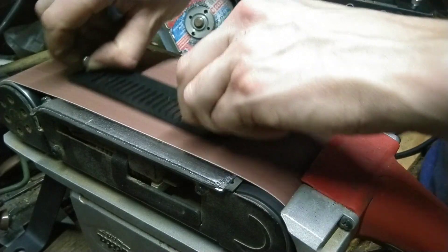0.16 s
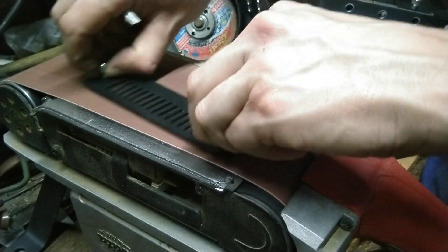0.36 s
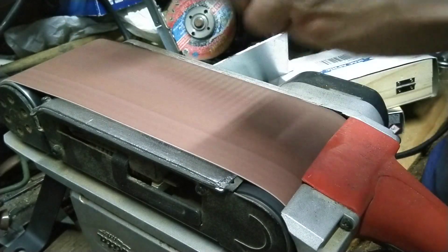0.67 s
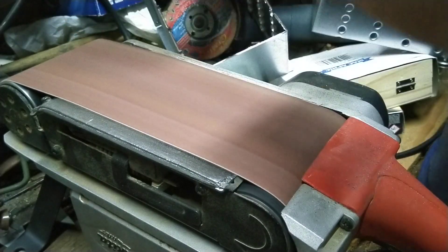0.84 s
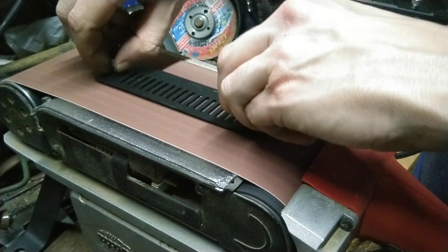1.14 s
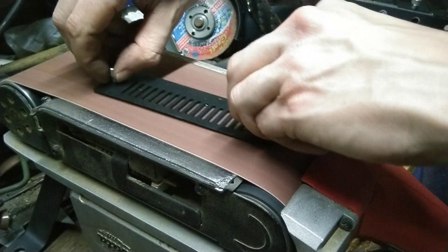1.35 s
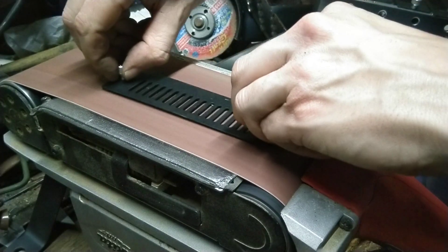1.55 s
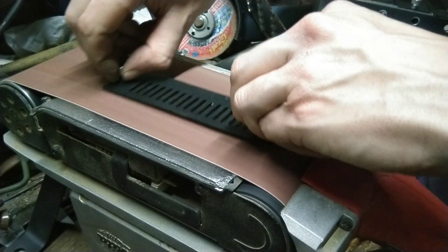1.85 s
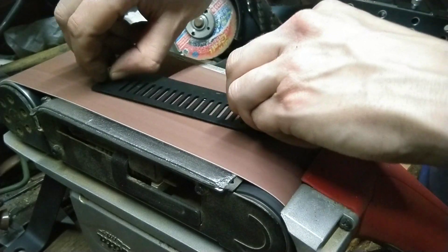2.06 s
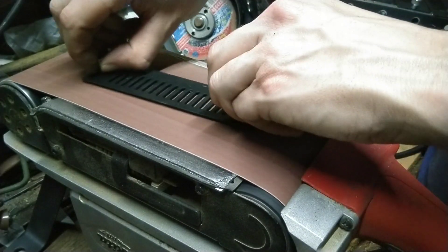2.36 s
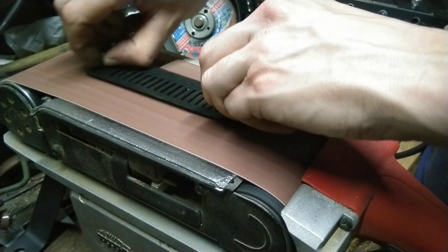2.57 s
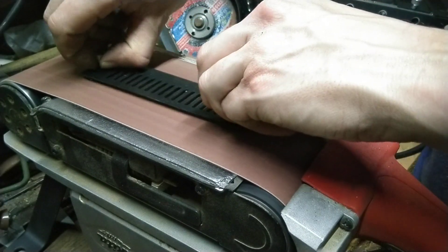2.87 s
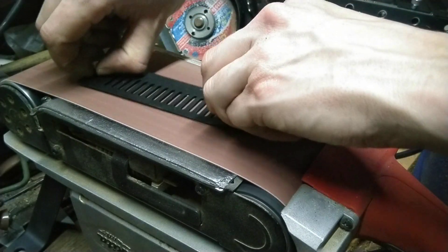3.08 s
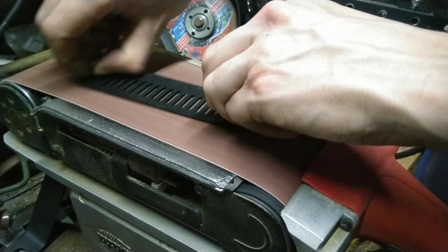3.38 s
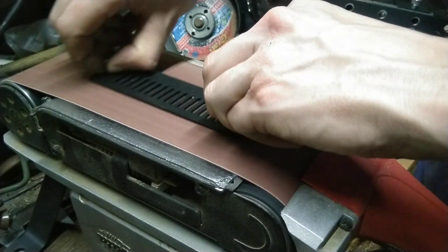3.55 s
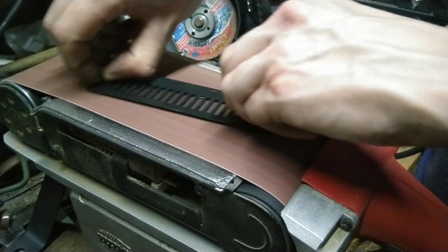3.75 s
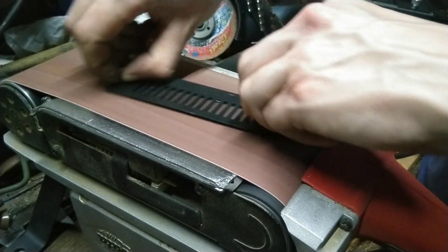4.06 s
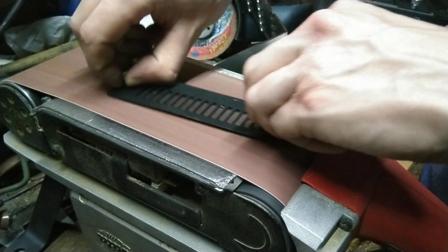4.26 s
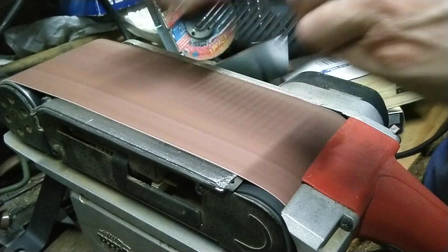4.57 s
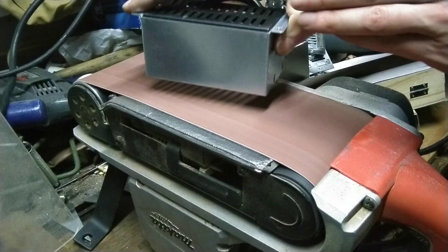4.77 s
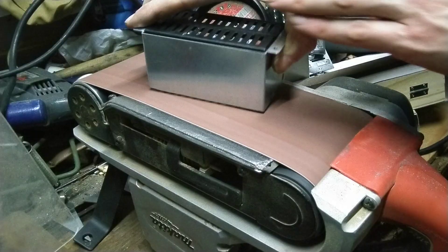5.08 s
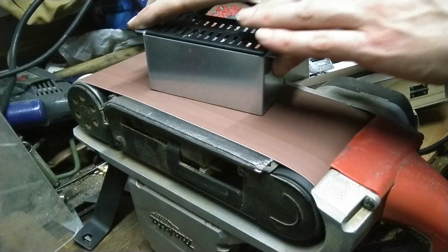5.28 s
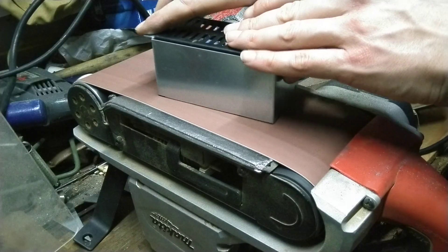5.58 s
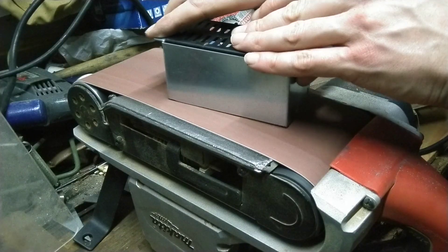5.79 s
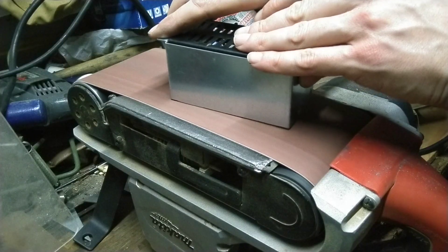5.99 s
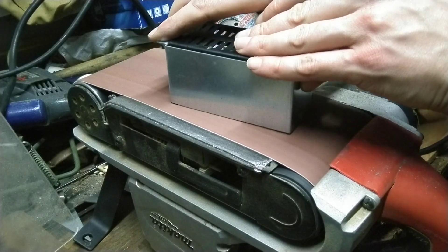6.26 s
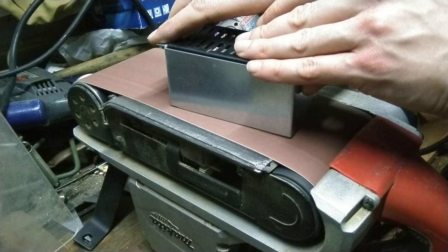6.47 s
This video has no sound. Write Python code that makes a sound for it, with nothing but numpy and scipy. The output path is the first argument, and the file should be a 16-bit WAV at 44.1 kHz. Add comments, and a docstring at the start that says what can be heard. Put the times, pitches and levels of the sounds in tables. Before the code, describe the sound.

Belt sander whines steadily while a slotted steel strip rasps in three gritty strokes, then a sheet-metal box rubs amid a fuller roar.

```python
"""Belt sander at the bench

A fast motor whines over the roar of fan, gears and belt, in tones locked to the rotor and bands of noise.
Random grit ticks excite a slotted steel strip in three strokes; then the modes of a sheet-metal box ring.
Lumpy low noise is fan air buffeting the right microphone port; short patches of noise near 830 Hz leak
through the noise suppressor, which holds the steady roar down at first; at 4.809 s, as the box takes over,
it is off and the roar opens up."""
import sys
import numpy as np
from scipy import signal
from scipy.fft import rfft, irfft
from scipy.io import wavfile
from scipy.ndimage import uniform_filter1d

SR = 44100
rng = np.random.default_rng(int(sys.argv[2]) if len(sys.argv) > 2 else 0)


def int16_out(signal):
    """Quantize to a 16-bit WAV file."""
    q = np.round(np.clip(np.atleast_2d(signal).T, -1, 1) * 32767)
    wavfile.write(sys.argv[1], SR, q.astype(np.int16))


N = 292383
T = np.arange(N) / SR   # time of every sample, s
SWITCH_S = 4.809   # a cut: from here the suppressor is off and the box replaces the strip
EARLY = T < SWITCH_S

# rotor speed, sagging under load and recovering when free; it jumps at the cuts at 0.91 and 4.81 s:
# t/s, speed/(turns per s)
ROTOR = [(0, 327), (.45, 325.7), (.905, 332.2), (.915, 337), (1.25, 336.6), (1.75, 330.3), (2.25, 327.8),
         (2.5, 327), (3.3, 331.3), (3.6, 330.6), (4.55, 327.2), (4.8, 331), (4.82, 333.2), (5.4, 333.1),
         (5.7, 331.9), (6.63, 326.4)]
# tones locked to the rotor (unbalance, gear train, fan blades, commutator): multiple of rotor speed
MULTIPLES = [1, 2, 2.205, 4.41, 8.8, 18, 31, 37]
# mean strength of each of those tones: level before switch/dB, level after/dB, left-right/dB
TONES = [(-54.5, -57, -1), (-57, -52.5, -20), (-62, -61, -6), (-48, -51, 0), (-53, -56.5, 0.5),
         (-56, -124, 2.5), (-46, -46, -2.5), (-52.5, -50, -2)]
WAVER_DB = 1.6   # spread of each tone's level
# the hands leave the belt and stop shading the high whine: start t/s, end t/s, lift/dB
HANDS_OFF = [(0.4, 0.535, 2.5), (4.659, 4.81, 3)]
SHADED_ABOVE, HANDS_MOVE_S = 30, .03   # shaded multiples of the rotor lie above this; time of the hands' move

# colour of the roar: f/Hz, relative level per Hz/dB
ROAR = [(120, -43), (200, -21), (386, -9.5), (667, -6), (772, -4), (1050, -10), (1490, -4), (1890, -9),
        (2530, -8.5), (3580, -8), (6080, -11), (10500, -11), (15700, -14.5)]
ROAR_DB = -33   # all bands together
# stereo balance of the machine: f/Hz, left-right/dB
ROAR_BALANCE = [(60, -18.0), (110, -17.0), (200, -12), (380, -7), (700, -4.5), (1290, -2), (2380, -5),
                (4400, 0), (8120, -7), (15000, 3)]
# resonances of the housing: f/Hz, width/Hz, level/dB
HOUSING = [(656, 84, -56.5), (1535, 86, -47.5), (2124, 290, -49), (3640, 11, -63), (6570, 50, -68),
           (7510, 47, -70.5), (11500, 150, -57), (11780, 320, -52.5)]
# likeness of left and right in the finished stereo sound; treble above 7 kHz is nearly mono: f/Hz, likeness
LIKENESS = [(300, 0.98), (520, 0.84), (770, 0.24), (1500, 0.083), (3000, 0.19), (6300, 0.062), (7300, 0.93),
            (15000, 1)]
# left channel's lead in samples, applied only below 6500 Hz; the near-mono treble has none
LEFT_LEAD, LEAD_BELOW_HZ = 7, 6500

# the strip on the belt: t/s, pressure as relative level/dB, tilt/(dB per octave), lift of the ring/dB
STROKES = [(0.0, -39.5, 0, 5), (0.22, -41.5, 3, 5), (0.35, -42, -0.2, -1), (0.5, -42.5, 1, -2),
           (0.62, -49.5, 1, 0), (1.0, -53, -5.1, 2.5), (1.15, -43, -1, 2.5), (1.3, -40, 1, 0),
           (1.45, -38.5, 0.3, 2), (1.75, -37.5, 0.6, 0.6), (2.25, -38, 0, 2.2), (2.36, -38.5, 0.1, -4.5),
           (2.62, -41.5, -1.5, 2), (2.7, -48.5, -1, -3), (2.8, -53, 6.5, -5), (2.98, -53.5, -2, -14),
           (3.09, -43, 0.5, -10), (3.28, -42, -0.5, -1), (3.36, -39.5, -0.5, 2.5), (3.52, -41, 0.2, -5),
           (3.7, -37.5, 0.1, -3.5), (3.9, -37, 0.8, 0), (4.1, -37, 0.7, 0), (4.3, -37, 0.5, 0.5),
           (4.53, -37, -0.15, 1), (4.6, -47.5, -1.5, -1), (4.66, -49, 5, 6), (4.8, -51, -1, 0.3)]
TILT_HZ, RING_HZ, RING_OCTAVES = 5860, 8600, 0.19   # pivot of the tilt; centre and width of the loudest ring
# modes of the strip: f/Hz, width/Hz, relative level/dB, left-right/dB
STRIP = [(1473, 13, -8.5, -16), (1915, 93, -7, -14), (2130, 270, -8, 18), (2901, 105, 1.5, -2),
         (3332, 430, -1.5, -14), (4434, 230, 0.5, -5), (4844, 120, -1, -0.5), (5860, 65, -4.5, -7),
         (6554, 130, -11.5, 15), (7070, 46, -9.5, -16), (8142, 280, -2.5, -9.5), (8500, 380, -12, -14.5),
         (8880, 150, -9, -12), (9610, 110, -10, 2), (10390, 790, -2, -9), (11040, 250, -15, 1),
         (11640, 90, -10.5, 15), (12150, 470, -20, 21), (12440, 870, -8, -5), (13100, 330, -20, -23)]
# broad rasp of the grit: low f/Hz, high f/Hz, relative level/dB, left-right/dB
RASP = [(1353, 1510, -1.5, 5.5), (2646, 3900, 2, 8), (4290, 5130, -2, -15), (5520, 7060, -5.5, -11.5),
        (7070, 8850, -4, -13), (8960, 11430, -0.5, -12.5), (10600, 16500, -5, 10), (12100, 16600, -11, 5.5)]
FIRM_DB, RASP_STEEPER = -35.5, 0.21   # below firm pressure the rasp fades faster than the modes (dB per dB)
# colour of the strip's sound, which the fingers damp unevenly: f/Hz, relative level/dB in four stretches
GRIT = [(1450, 1, -4.5, -3.5, -3.5), (1990, 1.5, -2, -3.5, -3), (2840, -2, -2, -3, -4.5),
        (3540, -12, -2.5, -2, 0.34), (4570, -6.5, -5, -4, -8.5), (5100, -8, -3, -1, -3.5),
        (6300, -3.5, -3.5, -2, -3.5), (8000, 1.2, -0.7, -2, -2.5), (9350, 1.1, 0.8, -2, 2.2),
        (11300, 1.8, 1.5, 0.5, 0.5), (13400, 1, 3, 5, 4)]
# times where the strip's colour changes, a cut at 0.91 s, then new grips: t/s
RECOLOUR_S = [.91, 2.8, 3.56]
# lift of the strip's thin low ring, which stands out at light touch: t/s, lift/dB
LOW_RING = [(0, 5.5), (.4, 5), (.55, -2), (1.2, -1.5), (2.2, 0.1), (2.65, -1), (2.82, -1), (2.9, 17.5),
            (3.05, 7.5), (3.2, 3), (3.4, 1), (4.6, 1.8)]
LOW_RING_HZ, LOW_RING_OCTAVES = 2890, .04

# colour of the air noise: f/Hz, relative level per Hz/dB
BUFFET_COLOUR = [(18, -42), (30, -16.5), (87, 1.5), (146, -1.5), (247, -12.5), (300, -4), (390, -28.5),
                 (660, -120)]
# gusts of fan air, before the gain of each port: start t/s, hold/s, level/dB
GUSTS = [(0.035, 0.086, -46.5), (0.244, 0.014, -47), (0.379, 0.028, -55.5), (0.441, .03, -48),
         (0.535, 0.024, -44), (0.633, 0.025, -51.5), (0.884, 0.013, -59), (0.982, 0.06, -51.5),
         (1.053, 0.054, -57), (1.262, .06, -52.5), (1.339, 0.018, -38.5), (1.435, .01, -44),
         (1.6, 0.014, -45), (1.7, 0.0077, -44.5), (1.877, 0.044, -57), (1.93, 0.022, -53),
         (2.138, 0.073, -47.5), (2.261, 0.014, -37), (2.33, 0.035, -61), (2.516, 0.047, -50),
         (2.668, 0.039, -42), (2.777, .03, -40.5), (3.069, 0.017, -43), (3.17, 0.041, -46),
         (3.463, 0.011, -52), (3.643, 0.089, -50), (3.787, .01, -47), (4.073, 0.012, -42.5),
         (4.2, 0.045, -46.5), (4.345, 0.0091, -54), (4.524, 0.062, -42.5), (4.701, 0.026, -43.5),
         (4.792, 0.0084, -45), (4.877, 0.025, -41), (5.016, 0.089, -44), (5.337, 0.043, -39),
         (5.489, 0.012, -43.5), (5.56, 0.12, -48), (5.844, 0.024, -44), (5.944, 0.0062, -37),
         (6.12, 0.013, -51.5), (6.226, 0.057, -52), (6.455, 0.015, -46), (6.57, 0.017, -41.5)]
GUST_RISE_DB_PER_S, GUST_FALL_DB_PER_S = 700, 348
BREEZE_DB, BREEZE_AFTER_DB = -66.5, -55   # mean air between gusts, before and after the switch
BREEZE_SWING_DB = 3.5

# short patches of noise near 830 Hz that leak through the noise suppressor: t/s, peak level/dB
LEAKS = [(0.601, -45), (1.0, -44), (1.08, -47), (2.74, -46), (2.981, -47)]
LEAK_HZ, LEAK_WIDTH_HZ, LEAK_S = 830, 73, 0.033
# modes of the box: f/Hz, width/Hz, starting level/dB, growth/(dB per s)
BOX = [(528, 67, -46, -1.7), (2578, 71, -53, 5), (2510, 45, -58, 3), (4260, 47, -55.5, 2.2),
       (5230, 67, -66, 13), (7580, 120, -51.5, 2.4)]
CUTOFF_HZ = 15780   # top of the finished sound


def amp(db):
    """Decibels to gain."""
    return 10 ** (np.asarray(db) / 20)


def sides(pan_db):
    """Left and right gains that differ by pan_db."""
    return amp([[pan_db / 2], [-pan_db / 2]])


def rms_one(x):
    """Scale to rms 1."""
    return x / np.sqrt(np.mean(x ** 2) + 1e-20)


def in_time(rows):
    """Columns of a curve table at every sample."""
    s, *columns = np.transpose(rows)
    return [np.interp(T, s, c) for c in columns]


def at_hz(points, hz):
    """A spectrum read on a log frequency axis."""
    points_hz, values = np.transpose(points)
    return np.interp(np.log(hz), np.log(points_hz), values)


def bell(hz, centre_hz, octaves):
    """Bell-shaped weight around a pitch, 1 at its centre."""
    return np.exp(-(np.log2(hz / centre_hz) / octaves) ** 2)


def drift(rate_hz):
    """Slow random curve of spread 1: noise smoothed by two equal poles on a grid of 40 samples."""
    r = np.exp(-80 * np.pi * rate_hz / SR)
    noise = rng.standard_normal(N // 40 + 2002)
    slow = signal.lfilter([1], [1, -2 * r, r * r], noise)[2000:]   # start-up dropped
    return np.interp(np.arange(N) / 40, np.arange(len(slow)), rms_one(slow))


def pair(mid_side, hz, pan_db):
    """Two unrelated signals become left and right of the likeness at this pitch."""
    alike = np.clip(at_hz(LIKENESS, hz), -1, 1)
    mid = np.sqrt(1 + alike) * mid_side[0]
    side = np.sqrt(1 - alike) * mid_side[1]
    both = np.array([mid + side, mid - side])
    if hz < LEAD_BELOW_HZ:
        both[0] = np.roll(both[0], -LEFT_LEAD)
    return both * sides(pan_db) / np.sqrt(2)


def band_pass(x, low_hz, high_hz):
    """Keep one band of a noise."""
    return signal.sosfilt(signal.butter(2, [low_hz, high_hz], "band", fs=SR, output="sos"), x)


def resonance(x, hz, width_hz):
    """A two-pole resonance driven by x; rms 1."""
    r = np.exp(-np.pi * width_hz / SR)
    return rms_one(signal.lfilter([1, 0, -1], [1, -2 * r * np.cos(2 * np.pi * hz / SR), r * r], x))


def whine(waver_db, wander):
    """Sines follow the rotor's turning; each wavers a little in level and phase."""
    turn = 2 * np.pi * np.cumsum(in_time(ROTOR)[0]) / SR
    clear_db = 0
    for start, end, lift_db in HANDS_OFF:
        hands_away = np.clip(np.minimum(T - start, end - T) / HANDS_MOVE_S + 1, 0, 1)
        clear_db = clear_db + lift_db * hands_away * EARLY
    out = 0
    for multiple, (before_db, after_db, pan_db) in zip(MULTIPLES, TONES):
        level_db = np.where(EARLY, before_db, after_db) + waver_db * drift(8.8)
        if multiple > SHADED_ABOVE:
            level_db = level_db + clear_db
        phase = multiple * turn + wander * multiple ** 0.14 * drift(13.4)
        out = out + amp(level_db) * np.sin(phase) * sides(pan_db)
    return np.sqrt(2) * out   # sines to rms 1


def roar(flicker_db):
    """Fan air and running belt: third-octave noise bands that flicker, plus the housing's resonances."""
    out, together = 0, drift(37)
    edges = np.geomspace(180, 18000, num=21)
    white = rng.standard_normal((2, 2, N))
    for k, (low, high) in enumerate(zip(edges, edges[1:])):
        hz = np.sqrt(low * high)
        band = band_pass(white[k % 2], low, high)   # neighbours use different noise
        gain = amp(at_hz(ROAR, hz) + flicker_db * (0.45 * together + drift(3.1)))
        out = out + gain * pair(band, hz, at_hz(ROAR_BALANCE, hz))
    out = amp(ROAR_DB) * rms_one(out)
    for k, (hz, width_hz, level_db) in enumerate(HOUSING):
        # reversed noise keeps the resonances unrelated to the bands
        rung = resonance(white[1 - k % 2, :, ::-1], hz, width_hz)
        out += amp(level_db + 2.08 * drift(18.0)) * pair(rung, hz, at_hz(ROAR_BALANCE, hz))
    return out


def scrape(grains_per_s, patchy_db, lift_db):
    """Abrasive grains tick against the strip: a broad rasp and ringing modes, damped unevenly by the fingers."""
    ticks = rng.random((2, 2, N)) < grains_per_s / SR
    grit = rng.standard_normal((2, 2, N)) * ticks + 1e-18
    pressure_db, tilt_db, ring_db = in_time(STROKES)
    low_ring_db, = in_time(LOW_RING)
    chatter = drift(34)   # shared by all parts
    grit_hz, *colours_db = np.transpose(GRIT)
    stretch = np.searchsorted(RECOLOUR_S, T)
    rasp_db = RASP_STEEPER * (pressure_db - FIRM_DB)

    parts = []
    for low, high, level_db, pan_db in RASP:
        sound = rms_one(band_pass(grit[0], low, high))
        parts.append((np.sqrt(low * high), sound, level_db + rasp_db, pan_db))
    for hz, width_hz, level_db, pan_db in STRIP:
        parts.append((hz, resonance(grit[1], hz, width_hz), level_db, pan_db))

    out = 0
    for hz, sound, level_db, pan_db in parts:
        colour_db = np.array([np.interp(np.log(hz), np.log(grit_hz), colour) for colour in colours_db])
        stroke_db = pressure_db + tilt_db * np.log2(hz / TILT_HZ) + colour_db[stretch]
        stroke_db = stroke_db + ring_db * bell(hz, RING_HZ, RING_OCTAVES)
        stroke_db = stroke_db + low_ring_db * bell(hz, LOW_RING_HZ, LOW_RING_OCTAVES)
        patches_db = patchy_db * (drift(5) + .4 * chatter)
        out = out + amp(stroke_db + level_db + lift_db + patches_db) * pair(sound, hz, pan_db)
    return out * EARLY


def buffet(lumpy_db, left_db, right_db):
    """Eddies push on the ports: low lumpy noise, its own in each; gusts rise fast, hold and die into the breeze."""
    hz = np.maximum(np.arange(N // 2 + 1) * SR / N, 1)
    spectrum = rfft(rng.standard_normal((2, N))) * amp(at_hz(BUFFET_COLOUR, hz))
    air = rms_one(irfft(spectrum, N))
    level_db = np.where(EARLY, BREEZE_DB, BREEZE_AFTER_DB) + BREEZE_SWING_DB * drift(6.8)
    for start, hold_s, gust_db in GUSTS:
        rise_db = GUST_RISE_DB_PER_S * np.maximum(start - T, 0)
        fall_db = GUST_FALL_DB_PER_S * np.maximum(T - start - hold_s, 0)
        level_db = np.maximum(level_db, gust_db - rise_db - fall_db)
    return air * amp(level_db + lumpy_db * drift(50)) * amp([[left_db], [right_db]])


def leaks():
    """Noise leaking through the suppressor: short patches near 830 Hz, the same left and right."""
    swell = sum(amp(db) * np.exp(-((T - s) / LEAK_S) ** 2) for s, db in LEAKS)
    return swell * resonance(rng.standard_normal(N), LEAK_HZ, LEAK_WIDTH_HZ)


def box(patchy_db):
    """The belt rubs the box's edge; pressed harder, its modes ring up, save the lowest, which fades."""
    since, out = T - SWITCH_S, 0
    for hz, width_hz, level_db, growth_db in BOX:
        rung = resonance(rng.standard_normal((2, N)), hz, width_hz)
        gain = amp(level_db + growth_db * since + patchy_db * drift(7.1))
        out = out + gain * pair(rung, hz, at_hz(ROAR_BALANCE, hz))
    return out * (since >= 0)


def scene():
    """Machine, work pieces, leaking noise and air at the ports."""
    machine = whine(waver_db=WAVER_DB, wander=0.57) + roar(flicker_db=1.0)
    work = scrape(grains_per_s=9000, patchy_db=1.09, lift_db=-3.0) + box(patchy_db=0.9)
    return machine + work + leaks() + buffet(lumpy_db=2.5, left_db=-21, right_db=4.5)


def suppress(x, over_db, floor_db, softness, memory_s, low_hz):
    """Above low_hz, each bin is turned down the more, the less it stands above its steady level."""
    size, hop = 1024, 256
    hz, s, bins = signal.stft(x, SR, nperseg=size, noverlap=size - hop)
    keep = np.exp(-hop / SR / memory_s)
    power = signal.lfilter([1 - keep], [1, -keep], np.abs(bins) ** 2)   # smoothed in time
    power = uniform_filter1d(power, size=3, axis=1)   # and across neighbouring bins
    # steady level: a low quantile of the bin's power before the switch
    steady = np.quantile(power[..., s < SWITCH_S], .15, axis=-1, keepdims=True)
    share = 1 - steady * amp(2 * over_db) * (hz > low_hz)[:, None] / (power + 1e-20)
    gain = np.maximum(np.maximum(share, 0) ** softness, amp(floor_db))
    return signal.istft(bins * gain, SR, nperseg=size, noverlap=size - hop)[1][:, :N]


def record(dry):
    """Suppressed until the switch, plain after it; bottom and top are cut."""
    quiet = suppress(dry, over_db=4.0, floor_db=-21.5, softness=0.83, memory_s=0.035, low_hz=180)
    out = np.where(EARLY, quiet, dry)
    out = signal.sosfilt(signal.butter(2, 45, "high", fs=SR, output="sos"), out)
    return signal.sosfilt(signal.ellip(12, .5, 75, CUTOFF_HZ, fs=SR, output="sos"), out)


dry = scene()
out = record(dry)
int16_out(out)
```